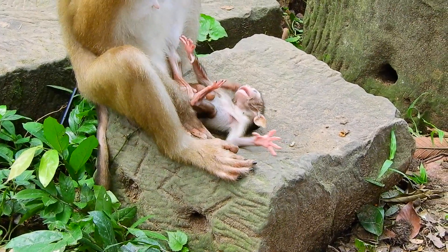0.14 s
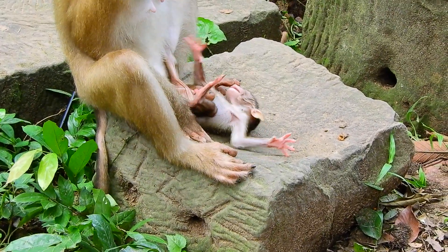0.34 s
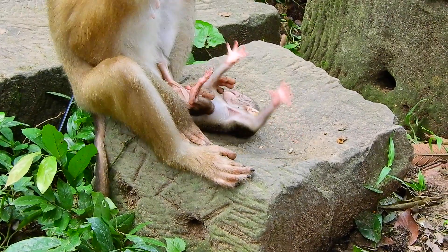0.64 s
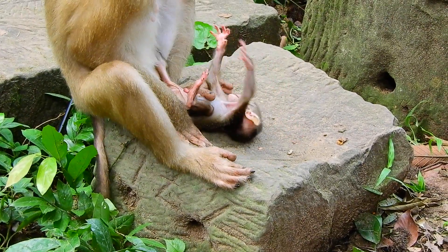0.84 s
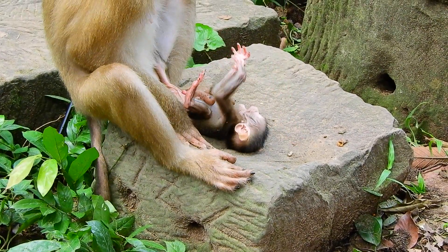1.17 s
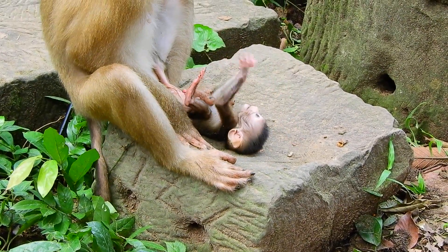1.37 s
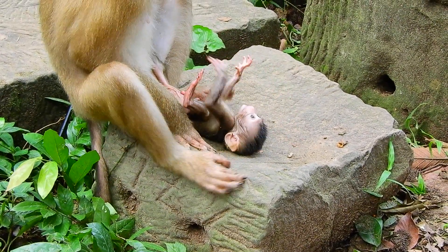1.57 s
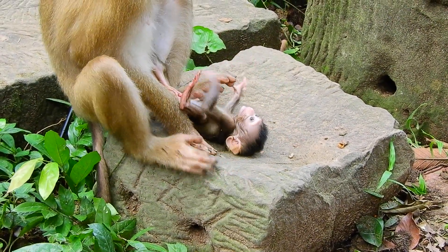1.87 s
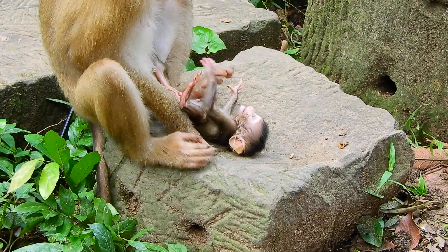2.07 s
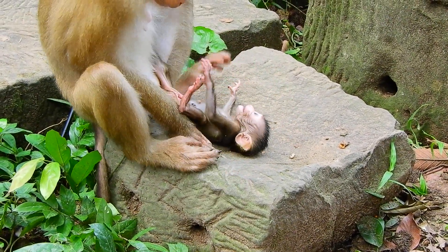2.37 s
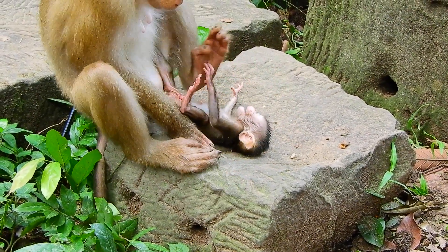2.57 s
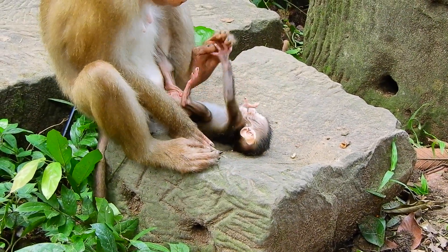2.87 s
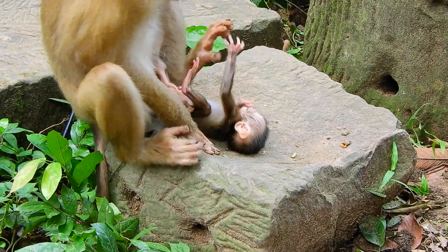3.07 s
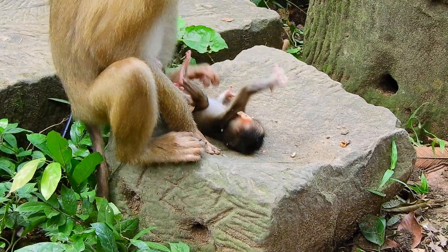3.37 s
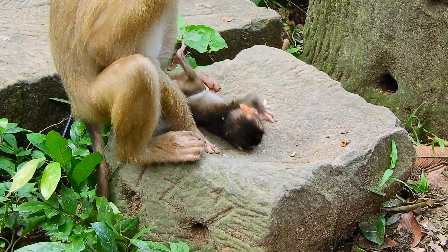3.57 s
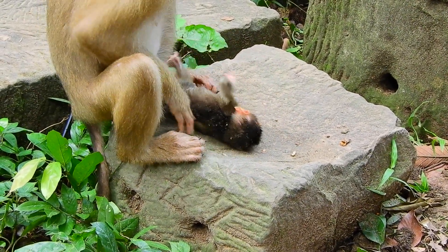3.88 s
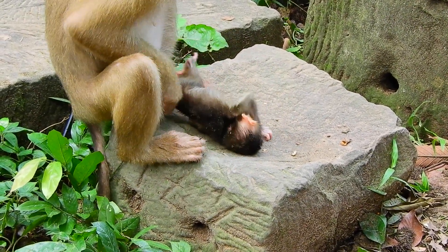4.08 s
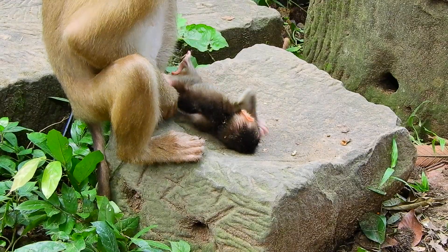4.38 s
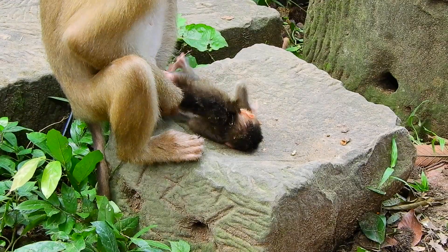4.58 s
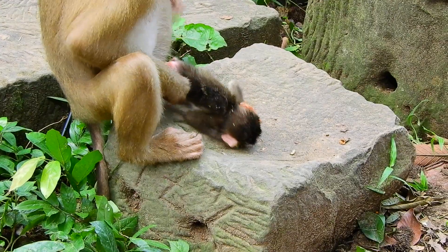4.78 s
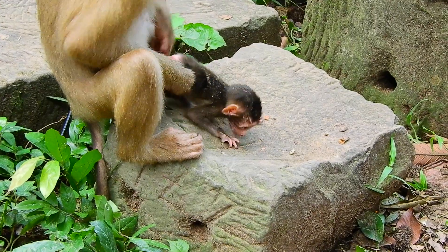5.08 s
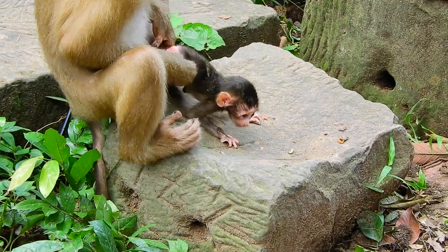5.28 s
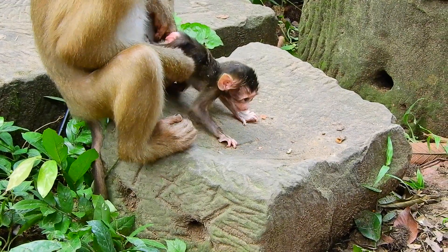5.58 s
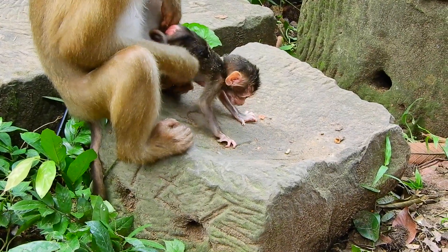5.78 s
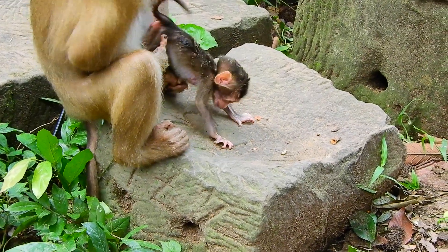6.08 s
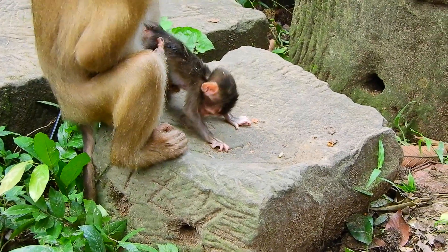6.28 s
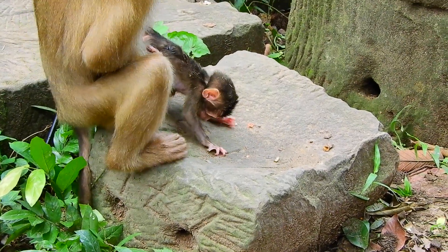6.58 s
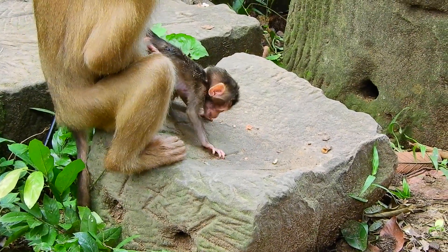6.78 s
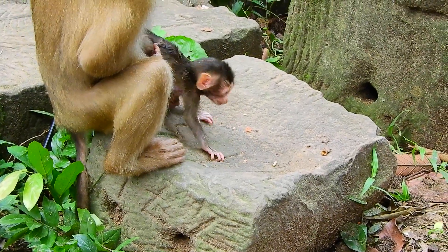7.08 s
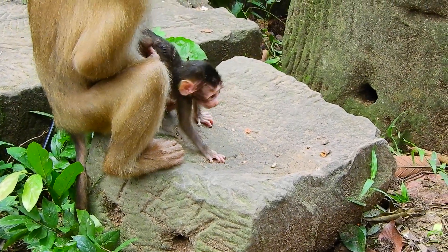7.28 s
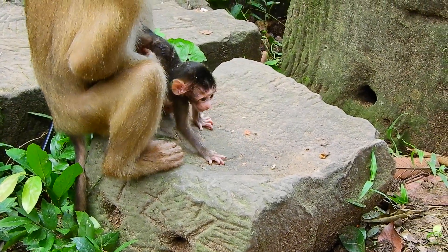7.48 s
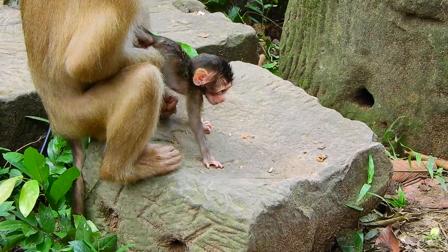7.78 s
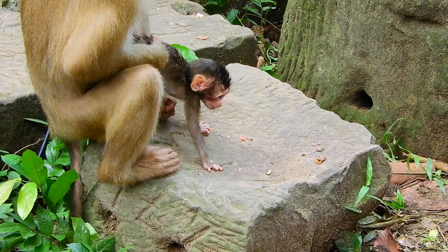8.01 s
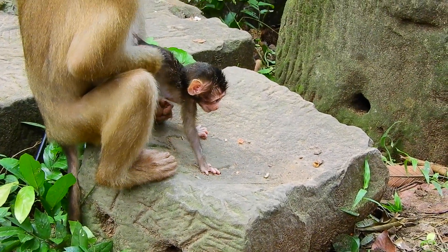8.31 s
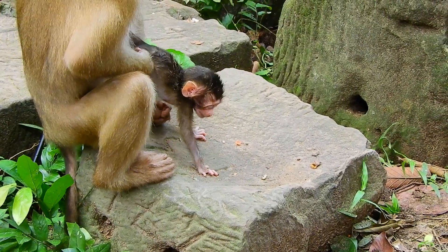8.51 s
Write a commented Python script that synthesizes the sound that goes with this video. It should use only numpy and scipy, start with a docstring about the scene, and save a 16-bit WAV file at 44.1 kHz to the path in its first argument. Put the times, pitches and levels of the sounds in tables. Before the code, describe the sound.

Short shrill chirps from a baby monkey on rock, dense at first then sparse, with tiny scuffs, faint grunts and a low steady hum.

```python
"""Over a low hum a newborn macaque brushes the rock it wriggles on and squeaks, in faint insect noise.
Each squeak is a sine peep at the mouth resonance, then an arched harmonic tone, longer when louder,
then a rasp of irregular pulses through resonances. Two thin whistles are wavering sines; soft grunts
are spectrally shaped harmonics and noise. Sparse impulse responses of rock and trees return the calls;
filtered noise makes steady far insects, and hum and air whose level dips briefly early on."""
import sys
import numpy as np
from scipy import signal
from scipy.fft import rfft, irfft, next_fast_len
from scipy.io import wavfile

SR = 44100
rng = np.random.default_rng(int(sys.argv[2]) if len(sys.argv) > 2 else 0)


def generate_wav(sig):
    """Save sig (samples, or channels by samples) to the path in sys.argv[1] as 16-bit PCM at SR."""
    pcm = np.round(np.clip(np.atleast_2d(sig).T, -1, 1) * 32767).astype(np.int16)
    wavfile.write(sys.argv[1], SR, pcm)


N = 381465  # samples in the scene


def monkey():
    """Superposition: the infant's calls add linearly in the left and right channels."""
    # squeaks: mouth opens t/s, rasp decay t/s, mouth resonance f/Hz, pitch f/Hz, glide/share of pitch,
    # roughness/1 (limited to 0-0.95), peep level/dB, fundamental level/dB, overtones level/dB, rasp level/dB
    squeak_rows = [(0.131, .026, 3600, 2338, -0.0035, 0.31, -36.5, -65, -11.5, -19.5),
                   (0.348, 0.015, 3950, 3900, .23, 0.36, -34, -34, -11.5, -39.5),
                   (0.371, 0.0059, 4060, 4334, .02, 0.36, -42, -26, -19.5, -21.5),
                   (0.448, .008, 4400, 4800, -0.027, 0.65, -75, -35, -56, -49),
                   (0.665, 0.0085, 3750, 4000, 0.092, 0.94, -40, -33, -33, -33),
                   (0.701, 0.018, 4400, 5020, 0.11, 1, -65, -20.5, -35.5, -43),
                   (0.907, 0.027, 3840, 4065, .12, 0.32, -28, -27, -28.5, -25),
                   (1.415, 0.014, 3170, 3560, -0.11, 0.6, -48, -36, -53, -52),
                   (2.222, 0.019, 3080, 3450, .05, 0.55, -46, -32, -44.5, -42),
                   (2.463, 0.0071, 3800, 4160, .11, 0.77, -44, -28, -37, -39),
                   (2.692, 0.011, 3900, 4160, 0.058, .1, -29.5, -25.5, -24, -41.5),
                   (2.932, 0.02, 3204, 3290, -0.07, .42, -38, -48, -38, -53),
                   (3.15, 0.016, 3020, 2990, -0.009, 0.8, -36.5, -35, -31, -35.5),
                   (3.445, 0.023, 3700, 3650, .13, 0.5, -24.5, -26, -30, -21),
                   (3.745, 0.029, 3130, 3090, .04, 0.46, -34.5, -50, -38, -48),
                   (3.957, 0.011, 2214, 2217, .04, 0.15, -34, -43.5, -36.5, -48),
                   (4.172, 0.025, 3670, 3380, .04, 0.8, -35.5, -35.5, -18, -15),
                   (4.237, 0.037, 3750, 3574, -0.071, 0.42, -64, -31, -11.5, -17.5),
                   (4.278, 0.024, 2250, 2520, -0.0052, 0.55, -49, -37.5, -30.5, -33.5),
                   (5.415, 0.016, 2212, 2500, .02, 1.06, -43, -25.5, -57, -50),
                   (8.003, .01, 2180, 2575, -0.074, 0.08, -51, -41.5, -27.5, -44.5),
                   (8.166, .012, 3260, 3630, -.02, 0.9, -39, -29, -33.5, -34.5),
                   (8.374, .016, 3590, 3760, -0.024, 0.85, -37, -35, -28, -31)]
    # one list of points per whistle: t/s, pitch f/Hz, level/dB, roughness/1
    whistle_tracks = [
        [(0.992, 8530, -19.5, 0.27), (1.03, 8980, -18, 0.3), (1.052, 9150, -26, .5), (1.08, 9050, -25, 0.64),
         (1.104, 9360, -17.5, 0.07), (1.125, 9100, -16, 0.07), (1.148, 8770, -15, 0.18),
         (1.157, 8450, -29, 0.35), (1.171, 8600, -21, .64)],
        [(4.535, 8960, -13, 0.07), (4.565, 9340, -20, 0), (4.605, 9900, -23, 0.02), (4.645, 9410, -22.5, 0.09),
         (4.695, 9090, -13.5, 0.09), (4.745, 8800, -13.5, 0.1), (4.77, 9050, -16.5, 0.05),
         (4.8, 8970, -17.5, 0.09), (4.817, 8400, -18, 0.29), (4.836, 8920, -17, 0.02), (4.89, 8010, -20, 0.16),
         (4.911, 7260, -25.5, 0.75)],
    ]
    # grunts: t/s, nominal length t/s, body level/dB, lisp level/dB
    grunt_rows = [(0.138, 0.035, -46, -48), (0.225, 0.069, -54.5, -40.5), (0.361, 0.023, -51.5, -64),
                  (0.691, 0.033, -57, -53), (1.402, 0.03, -50, -48), (1.533, .02, -54, -53),
                  (1.756, 0.041, -48, -57), (2, 0.033, -46.5, -54), (2.212, .029, -60, -45.5),
                  (3.152, 0.025, -47, -44.5), (3.415, 0.018, -46, -50), (3.461, 0.022, -42, -67),
                  (3.938, 0.0287, -50.5, -52.5), (5.221, 0.04, -48.5, -63), (5.409, 0.048, -43, -44),
                  (6.752, 0.021, -51.5, -58), (7.515, 0.052, -49, -57.5), (8.573, 0.027, -51, -44.5),
                  (8.617, 0.04, -57, -51)]
    # vocal-tract colour of a grunt: f/Hz, relative level/dB
    grunt_spectrum = [(200, -19), (400, 0), (800, 3), (1200, 5), (1550, -2.5), (2100, 4), (2700, -10),
                      (3500, -6), (5000, -28)]
    # colour of the lisp of air: f/Hz, relative level/dB
    lisp_spectrum = [(3000, -2), (5500, -5), (7400, 7.5), (9000, -2.5), (11500, -11), (15000, -45)]
    lisp_delay_s = .012  # after the start of the grunt

    out = np.zeros((2, N))
    for row in squeak_rows:
        add(out, *squeak(row))
    for track in whistle_tracks:
        add(out, *whistle(track))
    for s, length, body_db, lisp_db in grunt_rows:
        add(out, s, amp(body_db) * puff(length, grunt_spectrum, rough=.6))
        add(out, s + lisp_delay_s, amp(lisp_db) * puff(0.046, lisp_spectrum, rough=0.99))
    return out


def squeak(row):
    """Source and filter: periodic folds excite the tract, then lose their rhythm as the mouth closes."""
    # colour of the bright part of the rasp: f/Hz, relative level/dB
    edge_spectrum = [(2500, -54), (4500, 17), (5600, 10.5), (7000, 1), (8700, 1.5), (10000, 3.5),
                     (12000, -4), (15500, -46)]
    peep_s = .013  # the peep sounds just before the mouth opens
    # tone length at the loud level; it doubles with every further 38 dB
    tone_s, loud_db, doubling_db = .0175, -12, 38
    arch = 0.04505  # both ends of the tone lie this share of the pitch below its middle
    # the throat resonance follows the mouth's by a power law
    usual_throat_hz, usual_mouth_hz, throat_power = 6990, 3554, 0.75
    # the mouth resonance starts the rasp raised by a factor, then sinks by about this share
    rasp_lift, rasp_sink = 1.16, 0.0279
    rasp_carry = 3.5  # a falling tone falls on in its rasp, about this many times as far
    rasp_body_db = -6  # body against bright edge

    s, rasp, mouth_hz, mid_hz, glide, rough, peep_db, base_db, over_db, rasp_db = row
    rasp, rough = max(rasp, .004), np.clip(rough, 0, .95)
    tone = tone_s * 2 ** ((max(base_db, over_db) - loud_db) / doubling_db)
    throat_hz = usual_throat_hz * (mouth_hz / usual_mouth_hz) ** throat_power
    t = np.arange(-peep_s - .002, tone + 2 * rasp, 1 / SR)  # zero where the mouth opens
    n = len(t)

    # the closed-mouth peep slides up to its note
    rise = 1 - .1 * np.exp(-(t - t[0]) / 0.0036)
    peep_pitch = mouth_hz * rise * (1 + 0.036 * waver(n, 700))
    closed = np.interp(t, [t[0], -.7 * peep_s, 0, .003], [0.056, 0.87, 0.78, 0.043])
    peep_phase = 2 * np.pi * np.cumsum(peep_pitch) / SR
    voiced = amp(peep_db) * closed * np.sqrt(2) * np.sin(peep_phase)

    # the open mouth favours overtones near the throat resonance
    u = np.clip(t / tone, 0, 1) - .5
    pitch = mid_hz * (1 + glide * u - arch * (2 * u) ** 2)
    jitter_depth = 0.0046 + 0.039 * rough * np.interp(t, [0, tone], [.45, 1])
    jitter = jitter_depth * waver(n, 800)
    phase = 2 * np.pi * np.cumsum(pitch * (1 + jitter)) / SR
    overtones = np.zeros(n)
    for k in range(2, 7):
        formant = resonance(k * pitch, throat_hz, 1400) + .05
        rolloff = 1 + (k * pitch / 10200) ** 12
        overtones += formant / rolloff * np.sin(k * phase)
    overtones = evened(overtones)
    opened = np.interp(t, [-.003, .004, max(tone * 0.41, .003), tone - .001, tone + 0.0067],
                       [0, 1.23, 1.12, 0.66, 0.047])
    harmonics = amp(base_db) * np.sin(phase) * np.sqrt(2) + amp(over_db) * overtones
    voiced += opened * np.sqrt(1 - rough ** 2) * harmonics
    voiced *= 1 + 0.75 * rough * waver(n, 670)

    # slaps ring a sinking body resonance and brighter ones above it
    drive = flaps(n, rate_hz=650, leak=.45)
    rasp_time = np.maximum(t - tone, 0) / rasp
    fall = rasp_carry * min(glide, 0) - rasp_sink
    sinking = mouth_hz * rasp_lift * np.exp(fall * (1 - np.exp(-2.2 * rasp_time)))
    # a shaky voice lingers in the rasp
    creak = 2 * np.pi * np.cumsum(sinking * (1 + 0.0485 * waver(n, 724))) / SR
    body = evened(ring(drive, sinking, width=1560) + 1.05 * np.sin(creak))
    bright = ring(drive, 2 * sinking, width=2580)
    bright += 1.57 * ring(drive, np.full(n, throat_hz), width=3480)
    bright += 2.44 * drive
    bright += .9 * np.sin(2 * creak) + .6 * np.sin(3 * creak)
    edge = colour(bright, lambda f: amp(read(edge_spectrum, f)))
    broken = np.interp(t, [tone - .003, tone + 0.0011], [0, 1.25]) * np.exp(-1.3 * rasp_time ** 1.64)
    noisy = body * amp(rasp_db + rasp_body_db) * (broken + rough * opened)
    noisy += edge * (amp(rasp_db) * broken + 0.6 * rough * amp(over_db) * opened)
    return s + t[0], voiced + noisy * np.clip((t[-1] - t) / 0.0075, 0, 1)


def whistle(track):
    """Frequency modulation: one wavering sine spreads into noise where the voice is rough."""
    sway_db, sway_hz = 4, 55  # rms left-right level difference and its highest rate
    s, *columns = np.transpose(track)
    t = np.arange(s[0], s[-1], 1 / SR)
    hz, db, rough = (np.interp(t, s, c) for c in columns)
    n, rough = len(t), np.clip(rough, 0, .95)
    drift = 0.0035 * waver(n, 90) + 0.051 * rough * waver(n, 1166)
    phase = 2 * np.pi * np.cumsum(hz * (1 + drift)) / SR
    fray = colour(flaps(n, rate_hz=860, leak=1.2), lambda f: resonance(f, 8400, 2530) ** 2)
    tone = np.sqrt(2) * (1 - rough ** 2) * np.sin(phase) * amp(2.1 * waver(n, 90))
    voice = tone + 0.46 * rough * fray
    gate = np.sin(np.pi / 2 * np.clip(np.minimum(t - t[0], t[-1] - t) / 0.0015, 0, 1)) ** 2
    side_db = sway_db * waver(n, sway_hz)
    return s[0], voice * gate * amp(db + np.array([side_db, -side_db]) / 2)


def puff(length, spectrum, rough):
    """Mixed excitation: harmonics of falling pitch and turbulent air share one spectral filter."""
    n = int(max(length, .01) * SR * 1.2)
    u, rough = np.linspace(0, 1, n), np.clip(rough, 0, 1)
    pitch = np.interp(u, [0, 1], [435, 340])
    phase = 2 * np.pi * np.cumsum(pitch * (1 + 0.021 * waver(n, 300))) / SR
    folds = evened(sum(np.cos(k * phase) for k in range(1, 30)))
    drive = np.sqrt(1 - rough ** 2) * folds + rough * rng.standard_normal(n)
    swell = evened(u ** 0.31 * (1 - u) ** 1.02)
    return colour(drive, lambda f: amp(read(spectrum, f))) * swell


def flaps(n, rate_hz, leak):
    """Pulse excitation: irregular slaps of random strength with noise of leaking air; rms 1."""
    turns = np.cumsum(rate_hz * np.exp(.4 * waver(n, 500))) / SR
    slaps = np.diff(np.floor(turns), prepend=0) * rng.uniform(0.48, 1, n)
    return evened(evened(slaps) + leak * rng.standard_normal(n))


def ring(x, hz, width):
    """Heterodyne resonance: a triple-pole decay turned at the moving frequency hz; rms 1."""
    turn = np.exp(2j * np.pi * np.cumsum(hz) / SR)
    r = np.exp(-np.pi * width / SR)
    baseband = signal.lfilter([1], np.poly([r] * 3), x / turn)
    return evened((turn * baseband).real)


def scuffs():
    """Friction noise: small hands and feet brush the rock in bursts of decaying bright grit."""
    # brushes: t/s, level before the envelope/dB
    brushes = [(0.094, -35), (1.634, -52), (2.332, -52), (2.398, -48), (2.491, -37.5), (2.598, -45),
               (2.87, -44), (3.247, -41.5), (3.352, -48), (5.545, -47.5), (6.036, -47.5), (6.985, -49)]
    out, t = np.zeros(N), np.arange(0, .03, 1 / SR)
    envelope = np.clip(t / 0.0018, 0, 1) * np.exp(-t / 0.011)
    for s, db in brushes:
        grit = flaps(len(t), rate_hz=2500, leak=0.83)
        grit = colour(grit, lambda f: resonance(f, 7900, 3000) ** 2)
        add(out, s, amp(db) * grit * envelope)
    return out


def surroundings(x, tail_db):
    """Convolution reverberation: close rock echoes and a thin tail scattered by the trees."""
    # reflections off the rock: left delay t/s, right delay t/s, level/dB
    reflections = [(.0013, 0.0013, -38), (.0037, 0.0022, -7.5), (.0068, 0.0061, -10.5),
                   (0.0143, 0.013, -10)]
    # decay among the trees: f/Hz, time to fall by 60 dB t/s
    tree_decay = [(500, 0.89), (2500, 1), (4500, 0.99), (9000, 0.84), (14000, 0.56)]
    taps = rng.standard_normal((2, SR)) * (rng.random((2, SR)) < 3000 / SR)  # about 3000 per second
    hz, t, z = signal.stft(taps, SR, nperseg=256)
    decay = amp(-60 * t / read(tree_decay, hz)[:, None])
    onset = np.clip(t / 0.0069, 0, 1)
    tail = signal.istft(z * decay * onset, SR, nperseg=256)[1]
    response = amp(tail_db) * tail / np.linalg.norm(tail[0])
    for left, right, db in reflections:
        response[[0, 1], [round(left * SR), round(right * SR)]] += amp(db)
    return signal.fftconvolve(x, response, axes=1)[:, :N]


def background():
    """Spectral shaping of noise: a low distant hum, outdoor air and narrow steady bands of far insects."""
    # spectrum of the hum: f/Hz, relative density level/dB per Hz
    hum_spectrum = [(8, 2), (22, -24.5), (45, -2), (70, 2), (120, -1), (170, -7), (250, -14.5),
                    (400, -29.5), (900, -72)]
    # course of the hum before the dip is applied: t/s, level/dB
    hum_course = [(0, -46.5), (5, -46), (6.5, -44), (8.65, -45)]
    # spectrum of the air: f/Hz, relative density level/dB per Hz
    air_spectrum = [(200, -7.5), (320, 3.5), (450, -0.5), (750, 0.5), (1000, -3), (1900, -5), (3300, -10),
                    (4500, -9), (6300, -10.5), (8200, -11.5), (9600, -10), (12000, -16), (15800, -27.5)]
    # insect bands: centre f/Hz, nominal width f/Hz, level/dB
    insect_bands = [(5266, 240, -61.5), (7310, 136, -62), (9180, 340, -63)]
    air_db = -51.5  # outside the dip

    t = np.arange(N) / SR
    hum_db = np.interp(t, *np.transpose(hum_course)) + dip(t, depth_db=-7.5, recover_s=0.81)
    hum = wash(lambda f: amp(read(hum_spectrum, f))) * amp(hum_db)
    flutter_db = .5 * waver(N, 33)
    air_course = air_db + dip(t, depth_db=-6.5, recover_s=0.53) + flutter_db
    air = wash(lambda f: amp(read(air_spectrum, f))) * amp(air_course)
    insects = np.zeros((2, N))
    for hz, width, db in insect_bands:
        insects += amp(db) * wash(lambda f: resonance(f, hz, width))
    return (hum + air + insects) * amp([[-.35], [.35]])  # a little louder on the right


def dip(t, depth_db, recover_s):
    """Gain envelope of hum or air: the level sinks once, stays down, then recovers; in dB."""
    bottom_s, fall_s, hold_s = 0.38, 0.059, 0.15
    corners = bottom_s + np.cumsum([-fall_s, fall_s, hold_s, recover_s])
    return depth_db * np.interp(t, corners, [0, 1, 1, 0])


def wash(gain):
    """Interaural coherence: steady noise most alike in both channels in the bass; rms 1."""
    # coherence of the field: f/Hz, left-right correlation/1
    coherence = [(40, 0.9), (90, 0.99), (150, 0.82), (300, 0.52), (1000, 0.55), (5000, 0.18),
                 (14000, 0.157)]
    a, b = rfft(rng.standard_normal((2, N)))
    hz = np.fft.rfftfreq(N, 1 / SR)
    same = np.clip(read(coherence, hz), -1, 1)
    right = same * a + np.sqrt(1 - same ** 2) * b
    return evened(irfft(np.array([a, right]) * gain(hz), N))


def waver(n, hz):
    """Low-passed randomness: unsteadiness of rms 1 that rolls off above the rate hz."""
    return colour(rng.standard_normal(n), lambda f: 1 / (1 + (f / hz) ** 4))


def colour(x, gain):
    """Linear filtering: multiplies the spectrum by a gain function of frequency; rms 1."""
    size = next_fast_len(x.shape[-1] + 256)
    spectrum = rfft(x, size) * gain(np.fft.rfftfreq(size, 1 / SR))
    return evened(irfft(spectrum, size)[..., :x.shape[-1]])


def resonance(hz, centre, width):
    """Resonance curve: the gain is halved 1.24 widths from the centre."""
    return 1 / (1 + ((hz - centre) / (1.24 * width)) ** 2)


def read(points, hz):
    """Logarithmic frequency scale: interpolates a table along it."""
    f, value = np.transpose(points)
    return np.interp(np.log(hz + 1), np.log(f + 1), value)


def evened(x):
    """Power normalisation: scales to rms 1."""
    return x / np.sqrt(np.mean(x ** 2) + 1e-20)


def amp(db):
    """Level law: decibels to amplitude gain."""
    return 10 ** (np.asarray(db) / 20)


def add(mix, s, sound):
    """Superposition: adds a sound to the mix from time s in seconds."""
    part = mix[..., max(round(s * SR), 0):][..., :sound.shape[-1]]
    part += sound[..., :part.shape[-1]]


def scene():
    """Direct and reflected sound: the infant close by, its echoes and the background."""
    infant = monkey() + scuffs()
    return infant + surroundings(infant, tail_db=-16.0) + background()


def record(dry):
    """Clipping and band limitation: bounds the peaks at full scale, then low-passes."""
    edge_hz = 15900
    lowpass = signal.firwin(511, edge_hz, window=("kaiser", 9), fs=SR)
    return signal.oaconvolve(np.clip(dry, -1, 1), lowpass[None], "same")


dry = scene()
out = record(dry)
generate_wav(out)
```